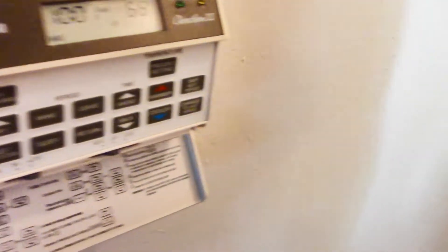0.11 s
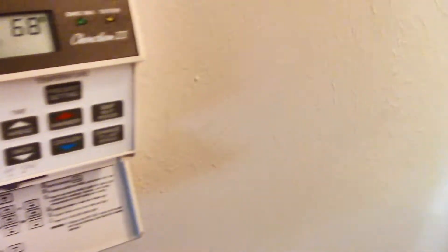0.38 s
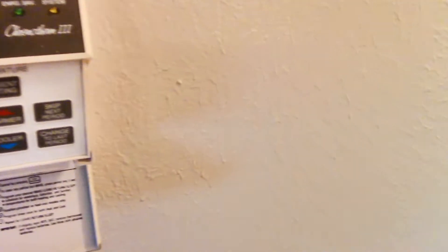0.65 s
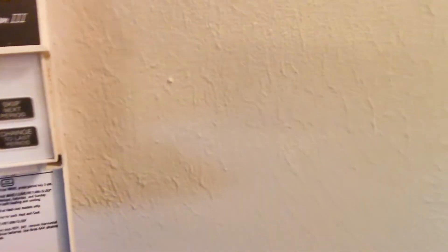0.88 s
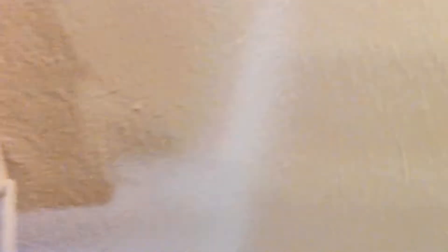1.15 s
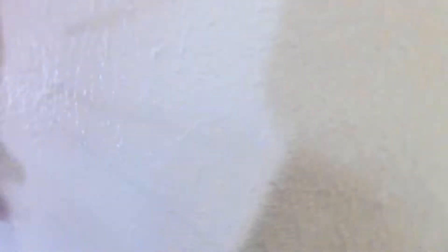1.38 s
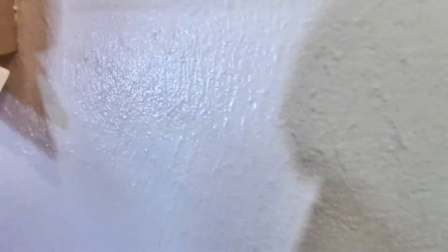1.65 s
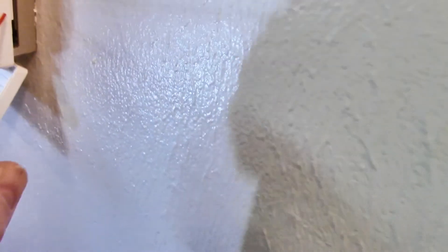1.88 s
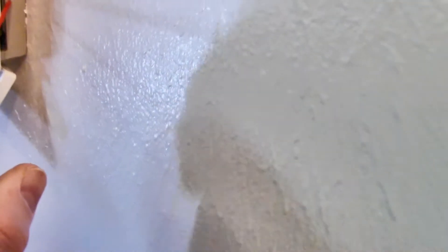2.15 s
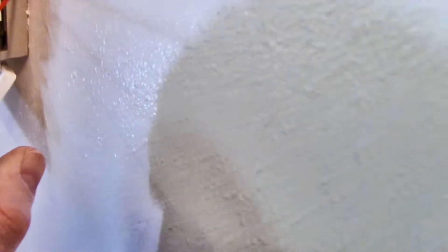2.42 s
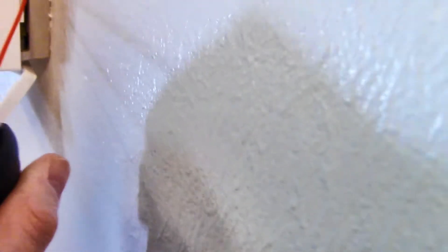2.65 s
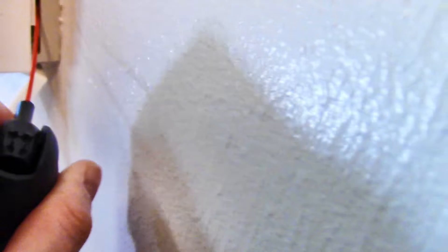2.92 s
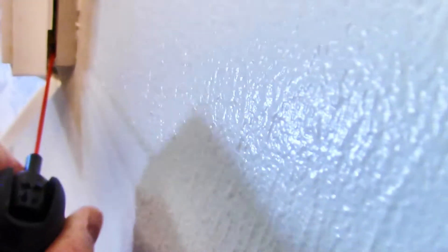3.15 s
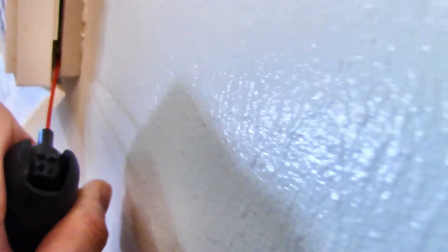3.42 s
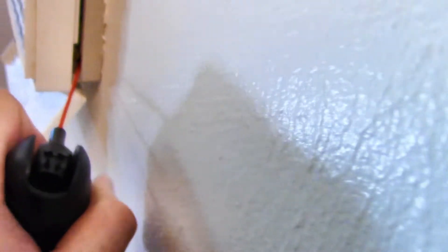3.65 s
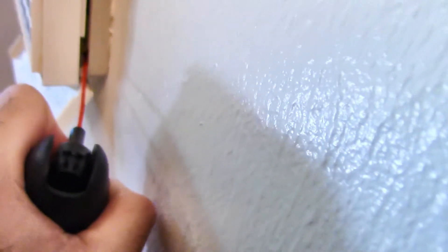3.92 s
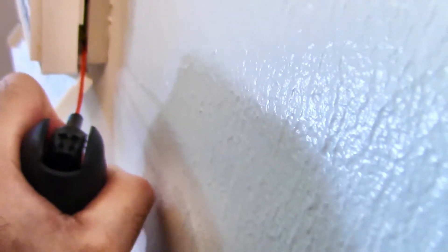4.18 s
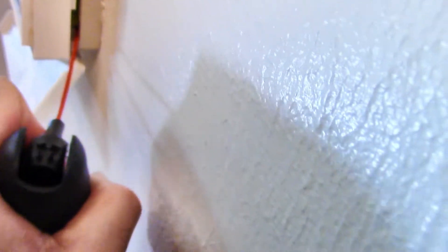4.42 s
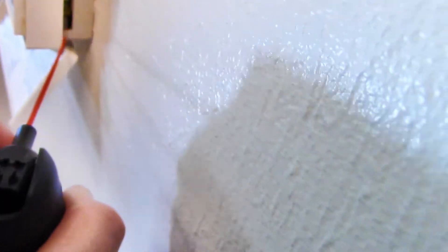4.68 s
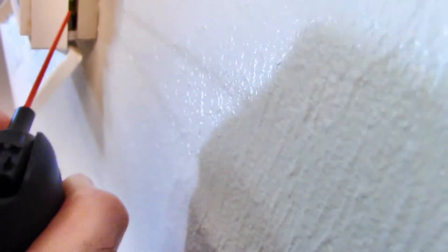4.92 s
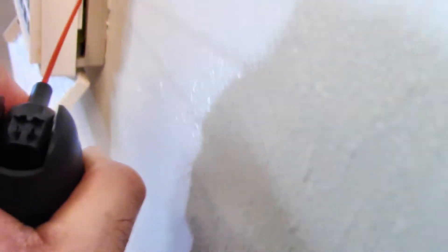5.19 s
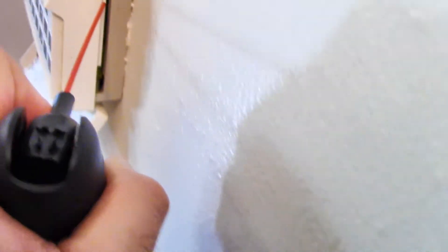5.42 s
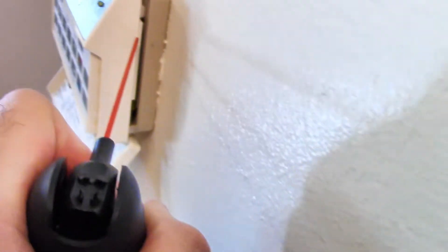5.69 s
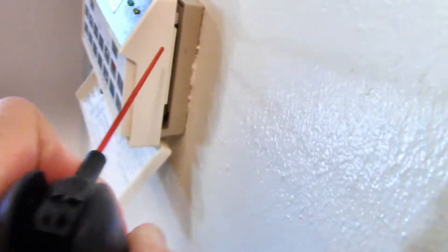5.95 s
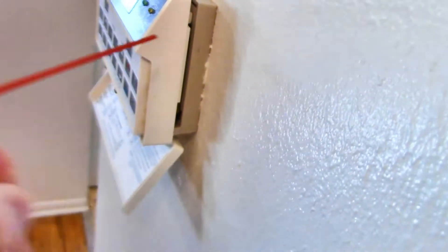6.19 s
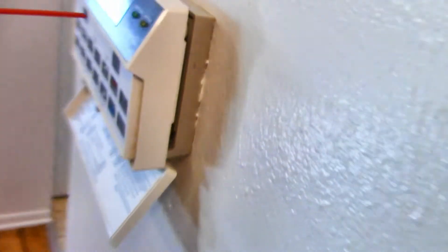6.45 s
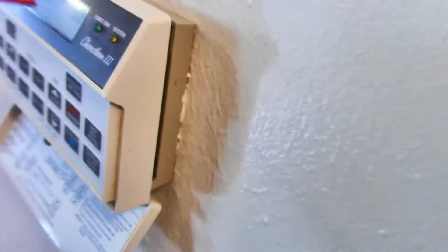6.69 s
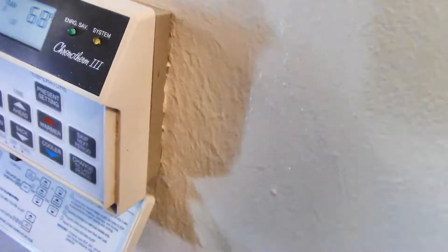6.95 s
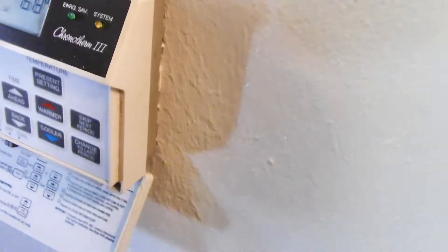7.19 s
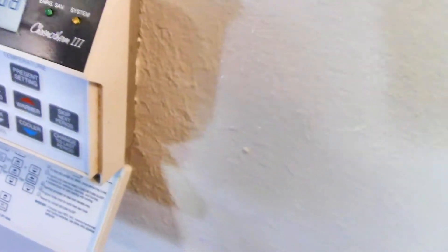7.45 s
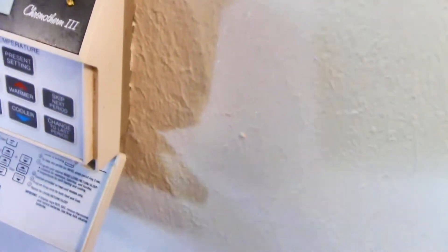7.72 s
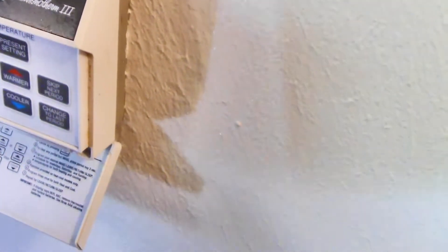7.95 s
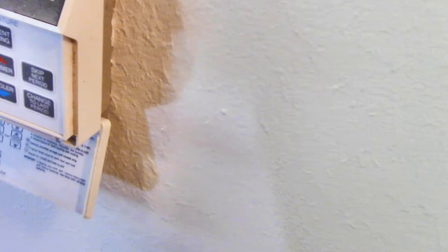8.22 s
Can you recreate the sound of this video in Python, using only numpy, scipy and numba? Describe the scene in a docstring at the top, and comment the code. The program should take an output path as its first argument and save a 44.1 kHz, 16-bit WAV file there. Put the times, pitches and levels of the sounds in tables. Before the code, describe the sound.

A can of compressed air hisses briefly, is fumbled with clicks and rustles, then sprays three long, shifting blasts close to the microphone.

```python
"""A can of compressed air is already blowing through a thin straw into the gap behind a plastic wall unit.
That first of four blasts is filtered noise: it hisses, booms in the hollow case, roars across the gap and fizzes at
the tip as the aim moves. Then the hand shifts on the can, with noise strokes of rub and rustle and thin hums, bumps
the microphone, and the straw ticks on plastic as noise bursts ringing modes. Three more blasts follow, close together.
A small room of feedback delays and faint air noise lie under it all, on a mono microphone."""
import sys
import numpy as np
from scipy import signal
from scipy.fft import rfft, irfft, next_fast_len
from scipy.io import wavfile
from scipy.ndimage import uniform_filter1d, map_coordinates
from numba import njit

SR = 44100
rng = np.random.default_rng(int(sys.argv[2]) if len(sys.argv) > 2 else 0)


def invert_db(level):
    """Linear amplitude ratio for a level in decibels (20 dB per decade), elementwise."""
    return 10 ** (np.asarray(level, dtype=float) / 20)


def wav_out(sig):
    """Save sig, one row per channel (or a flat mono array), as 16-bit PCM at SR to the path in sys.argv[1]."""
    wavfile.write(sys.argv[1], SR, np.round(np.clip(np.atleast_2d(sig).T, -1, 1) * 32767).astype(np.int16))


N = 367794
T = np.arange(N) / SR


def level(x, db):
    """Set the rms level in dB."""
    return x * invert_db(db) / np.sqrt(np.mean(x ** 2))


def hiss(spectrum):
    """Noise of rms 1 whose density follows (frequency, level) points, joined on a log frequency scale."""
    hz, db = np.transpose(spectrum)
    size = next_fast_len(N)
    bins_hz = np.arange(1, size // 2 + 2) * SR / size
    colour = invert_db(np.interp(np.log(bins_hz), np.log(hz), db))
    noise = irfft(rfft(rng.standard_normal(size)) * colour, size)
    return level(noise[:N], 0)


@njit
def band_pass(x, hz, width):
    """State-variable band-pass whose centre may move, gain 1 at the centre."""
    y, band, low = np.empty(len(x)), 0., 0.
    for i in range(len(x)):
        g, k = np.tan(np.pi * hz[i] / SR), width / hz[i]
        v = (band + g * (x[i] - low)) / (1 + g * (g + k))
        band, low, y[i] = 2 * v - band, low + 2 * g * v, k * v
    return y


def resonate(x, peaks):
    """Sum of fixed resonances with alternating signs, rms 1."""
    total = np.zeros(N)
    for k, (hz, width, db) in enumerate(peaks):
        total += (-1) ** k * invert_db(db) * band_pass(x, np.full(N, 1. * hz), 1. * width)
    return level(total, 0)


def walk(rate):
    """Random values held 1 / rate s and slewed twice; spread near 1."""
    hold = int(SR / rate)
    steps = np.repeat(rng.standard_normal(N // hold + 1), hold)
    return 1.3 * uniform_filter1d(uniform_filter1d(steps, hold), hold)[:N]


def add(x, s, sound):
    """Mix a short sound in at time s."""
    i = int(s * SR)
    x[i:i + len(sound)] += sound[:N - i]


def ring(modes, chatter, crack=0):
    """A rough contact drives every decaying mode of a body and can also be heard bare; peak 1."""
    t = np.arange(3000) / SR
    body = sum(invert_db(db) * np.sin(2 * np.pi * hz * t) * 1000 ** (-t / t60) for hz, db, t60 in modes)
    y = np.convolve(chatter, body)
    y[:len(chatter)] += crack * np.convolve(chatter, [1, 0, 0, -1])[:len(chatter)]
    return y / np.abs(y).max()


# the straw holds one aim, then jumps to the next; the bare jet has 5.5 dB on the scale of the shares:
# (time [s], jet level [dB], hollow boom share [dB], gap roar share [dB], tip fizz share [dB])
STRAW_AIMS = [(0, -8, -6, 10, 8), (0.033, -14.5, 11, 12.5, 1), (0.069, -8.5, -7.5, 9.5, 7),
              (0.178, -15, 3.5, 13.5, 7), (.225, -13, 3, 9.5, 14.5), (.33, -16, 2, 10, 8.5),
              (.45, -10.5, -4, 9.5, 6.5), (.515, -14.5, -4, 4.5, 0.5), (.55, -13.5, -2.5, 8.5, 8),
              (.59, -15.5, -8.5, 9.5, 3), (3.5, -24.5, 7, -5.5, -3.5), (3.612, -8, 7.5, 9.5, -6.5),
              (3.914, -10, 0, 16.5, 11), (4.3, -8.5, 0, 19.5, 13.5), (4.47, -8, 3.5, 22.5, 11.5),
              (4.639, -9, 6.5, 16, 15), (4.71, -9, -2, 15, 17.5), (4.9, -22, 1, 13, 10.5),
              (5.039, -18, 3, 7.5, 7), (5.112, -9, -1.5, 12, 19), (5.27, -9.5, -0.5, 9.5, 17),
              (5.49, -8.5, 1, 8.5, 13.5), (5.721, -9.5, -0.5, 11.5, 16), (5.854, -14, -1.5, 13, 10),
              (6.019, -23.5, -7, -12.5, -11), (6.1, -28.5, -4.5, 2, -5), (6.22, -15.5, -8, 9, 5.5),
              (6.31, -18, -3, 8.5, 8), (6.47, -19.5, -1.5, 13, 13.5), (6.661, -17.5, 4, 19, 18),
              (6.8, -13, 1, 16, 7.5), (6.93, -14, -4, 9, -4), (7.06, -16, 3, 9.5, 0),
              (7.2, -15.5, 3, 14, 6), (7.278, -17.5, 4.5, 15.5, 18), (7.6, -18.5, 7, 16, 19.5),
              (7.86, -17.5, 7, 16, 19), (7.95, -15.5, 0, 18, 15.5), (8.036, -16, -8, 2, -14),
              (8.105, -22, 0.5, 4.5, 3), (8.25, -19, -2, 9, -0.5)]


def aim():
    """Jet level and shares of boom, roar and fizz, each jump of aim spread over 14 ms."""
    start, *columns = np.transpose(STRAW_AIMS)
    held = np.searchsorted(start, T, "right") - 1
    return [uniform_filter1d(column[held], size=int(0.014 * SR)) for column in columns]


# as the straw travels; sizzle on the same scale as the other shares:
# (time [s], gap resonance [Hz], tip resonance [Hz], open-air sizzle share [dB])
STRAW_TRAVEL = [(0, 3400, 9500, 8.5), (.17, 3930, 8700, 3.5), (.22, 4380, 10800, -6.5),
                (.45, 4230, 9400, -16.5), (.6, 4120, 8800, 7.5), (3.62, 3320, 7950, -19),
                (3.9, 3590, 7600, -17.5), (4.3, 3680, 7200, 10), (4.63, 4370, 7900, 10.5),
                (4.66, 3320, 8900, -6), (4.8, 4340, 7500, -19.5), (5.11, 3370, 9700, -25),
                (5.5, 3450, 8000, -23), (5.8, 4140, 8600, -9), (5.9, 3920, 8100, 15),
                (6.0, 3630, 7200, -23.5), (6.27, 3550, 9600, -13), (6.45, 3610, 8500, -1),
                (6.55, 4960, 8200, 12), (6.78, 4090, 9500, 17), (6.85, 4120, 7900, 4),
                (7.2, 3980, 8500, -3.5), (7.3, 4090, 10600, 18.5), (7.701, 3850, 9000, 18.5),
                (8.0, 3520, 9000, 7), (8.1, 3140, 8500, -19), (8.29, 3500, 8800, -8.5)]


def travel():
    """Resonances and open-air sizzle glide as the straw travels."""
    s, *columns = np.transpose(STRAW_TRAVEL)
    return [np.interp(T, s, column) for column in columns]


# short swells of the jet: (middle [s], half width [s], level [dB])
JET_SURGES = [(4.978, 0.01, 10.5), (5.66, .05, 1), (5.971, 0.024, 5.5), (6.275, 0.011, 6), (6.83, 0.11, 0),
              (7.25, 0.071, 3), (8.02, 0.046, 6.5), (8.285, .012, 5)]


def surges():
    """Bell-shaped swells, in dB."""
    return sum(db * np.exp(-((T - mid) / half) ** 2) for mid, half, db in JET_SURGES)


# the valve opens and shuts; the first blast is already under way: (opens [s], is shut [s])
VALVE_BLASTS = [(-.1, .642), (3.571, 4.804), (4.946, 6.04), (6.199, 8.304)]


def valve():
    """Flow through the valve, ramped in dB at both ends of a blast and nil between blasts."""
    open_s, shut_s, quiet_db = 0.013, 0.015, -24  # ramps, and the level at their quiet ends
    total = np.zeros(N)
    for start, end in VALVE_BLASTS:
        opening = np.clip(np.minimum((T - start) / open_s, (end - T) / shut_s), 0, 1)
        total += (T > start) * (T < end) * invert_db(quiet_db * (1 - opening))
    return total


# the straw tip is pressed shut for a moment, edges still sharp: (time [s], length [s], depth [dB])
TIP_BLOCKS = [(4.634, 0.0137, -5), (5.475, .022, -12.5), (5.521, 0.0039, -23), (5.609, 0.013, -11.5),
              (5.636, 0.0091, -17.5)]


def jet_flow(jet_db):
    """Valve, jet level and a pressed tip set how strongly the air flows."""
    flow = valve() * invert_db(jet_db)
    for start, length, db in TIP_BLOCKS:
        flow = flow * invert_db(db * ((T > start) & (T < start + length)))
    flow = flow * invert_db(0.66 * walk(60))
    return uniform_filter1d(flow, size=100)  # the valve takes a few ms to move


# colour of the bare jet: (frequency [Hz], relative density [dB])
JET_COLOUR = [(40, -71), (150, -31), (500, -18), (1300, -0.5), (2200, 1.5), (5500, -16.5), (15600, -22)]
# resonances of the hollow case: (frequency [Hz], width [Hz], relative level [dB])
HOLLOW_CASE = [(658, 295, -1.5), (830, 260, 0.5), (1220, 167, -2)]


def jet():
    """Turbulent air, and the spaces it excites as the straw is aimed; also returns its flow."""
    jet_db, boom_db, roar_db, fizz_db = aim()
    gap_hz, tip_hz, sizzle_db = travel()
    surge_db = surges()
    fizz_db = fizz_db + surge_db  # each swell fizzes more
    flow = jet_flow(jet_db + surge_db)

    boom_air, gap_air, tip_air, open_air = rng.standard_normal((4, N))
    gap_hz = gap_hz * (1 + 0.015 * walk(12))
    broad = band_pass(band_pass(gap_air, gap_hz, 3660.0), gap_hz, 3400.0)
    core = band_pass(gap_air, gap_hz, 570.0)
    # the squarer the jet strikes, the narrower its roar
    roar = level(broad + invert_db(roar_db - 25) * core, 0)
    fizz = level(band_pass(band_pass(tip_air, tip_hz, 6500.0), tip_hz, 8000.0), 0)
    boom = resonate(boom_air, HOLLOW_CASE)
    sizzle = resonate(open_air, [(11700, 5800, 0)])

    layers = [hiss(JET_COLOUR), boom, roar, fizz, sizzle]
    shares = invert_db([np.full(N, 5.5), boom_db, roar_db, fizz_db, sizzle_db])
    mix = sum(x * share * invert_db(1.3 * walk(45)) for x, share in zip(layers, shares))
    # the shares set the colour, the flow alone the level
    return flow * mix / np.sqrt(np.sum(shares ** 2, axis=0)), flow


# echoes off wall and case: (mean delay [ms], gain before its wobble [factor], drift of delay [share])
NEAR_ECHOES = [(.31, .2, .06), (.66, .2, .15), (1.0, .12, .15)]


def wall_echoes(direct):
    """Wall and case a hand's width away send the treble back; the paths drift as the can moves."""
    treble = signal.sosfilt(signal.butter(1, 4000, "high", fs=SR, output="sos"), direct)
    out = np.zeros(N)
    for ms, gain, drift in NEAR_ECHOES:
        wobble = invert_db(3 * walk(5))
        delay = SR / 1000 * ms * (1 + drift * walk(2.5))  # samples
        out += gain * wobble * map_coordinates(treble, [np.arange(N) - delay], order=3)
    return out


# spent air at the microphone during the second and third blasts, before its wobble: (time [s], level [dB])
SPENT_AIR = [(3.6, -30), (4.1, -49.5), (4.6, -45), (4.66, -38.5), (5.3, -58), (5.52, -28), (6.0, -52.5)]


def buffeting(flow):
    """Low noise of spent air buffets the microphone during the second and third blasts."""
    open_valve = uniform_filter1d(1. * (flow > 1e-3), size=400)
    gust_db = np.interp(T, *np.transpose(SPENT_AIR), left=-99, right=-99) + walk(25)
    return open_valve * resonate(rng.standard_normal(N), [(221, 270, 0)]) * invert_db(gust_db)


# the straw and trigger tick and scratch on plastic:
# (time [s], peak level [dB], added to the lower modes [dB], chatter [ms])
PLASTIC_TICKS = [(1.309, -36, 8, 4.8), (1.987, -23.5, -14, 2.9), (2.045, -25, -15, 3.6),
                 (2.443, -5.5, 0.5, 4), (2.451, 0, 18, 3.7), (2.484, -30, 15, 3), (2.606, -16.5, 20.5, 5.1),
                 (2.887, -13, 1, 5.9), (2.93, -24, -18, 6.4), (2.953, -24, -18, 8.4), (2.981, -28, -3, 7),
                 (3.029, -25, 8, 10), (3.193, -13, 13.5, 10), (3.467, -26, 29, 5.9)]
# modes of the plastic, before that shift: (frequency [Hz], relative level [dB], 60 dB decay [s])
PLASTIC_MODES = [(1700, -3, .005), (2400, -5, .004), (3160, -4, .009), (3800, -6, .004), (4500, -2, .009),
                 (6000, -3, .004), (8000, -1, .004), (10100, 1, .004), (12200, -5, .003)]


def ticks():
    """Each contact chatters for a few ms; how squarely it lands sets the share of the lower modes."""
    out = np.zeros(N)
    for s, db, low_db, ms in PLASTIC_TICKS:
        modes = [(hz, mode_db + low_db * (hz < 7000), t60) for hz, mode_db, t60 in PLASTIC_MODES]
        fade = np.exp(-(np.arange(900) * 1000 / SR / ms) ** 2)
        add(out, s, invert_db(db) * ring(modes, rng.standard_normal(900) * fade, crack=5.0))
    return out


# dull bumps on the hand-held microphone, before its mount:
# (time [s], peak level [dB], added to the upper modes [dB])
MIC_BUMPS = [(0.067, -14, -12), (0.77, -31.5, -1), (0.955, -28, 3), (0.87, -27, -8), (1.223, -12, -1),
             (1.447, -23.5, -15), (1.777, -33, -9), (2.111, -17, -10), (2.361, -26, 3), (2.755, -23, 2),
             (3.101, -19, 8), (3.181, -13, 23), (4.63, -9.5, 3), (5.493, -7, 18), (8.137, -22, 7),
             (8.149, -16, -4), (8.171, -17.5, -12)]
# modes of the microphone body, before that shift: (frequency [Hz], relative level [dB], 60 dB decay [s])
MIC_BODY = [(205, -1, 0.022), (321, -1, 0.016), (594, -0.5, 0.041), (800, -2, 0.011), (1050, -9, 0.014)]


def bumps():
    """A soft, shuffling push of some ms on the microphone body, whose mount takes up the slowest part."""
    out = np.zeros(N)
    fade = np.exp(-np.arange(1200) / (0.0069 * SR))
    for s, db, high_db in MIC_BUMPS:
        modes = [(hz, mode_db + high_db * (hz > 400), t60) for hz, mode_db, t60 in MIC_BODY]
        add(out, s, invert_db(db) * ring(modes, rng.standard_normal(1200) * fade))
    return signal.sosfilt(signal.butter(3, 160, "high", fs=SR, output="sos"), out)


# thin hums that come and go while the can is rubbed:
# (start [s], end [s], frequency at the start [Hz], glide [Hz/s], level [dB])
RUBBED_HUMS = [(1.322, 1.43, 235, -1, -38.5), (1.5, 1.75, 404, 1, -40.5), (2.05, 2.305, 2000, -700, -41.5),
               (2.76, 2.94, 246, 0, -36.5), (2.885, 3.0, 3120, 0, -43.5), (2.89, 2.99, 5600, 0, -52),
               (2.99, 3.07, 1830, -1000, -42)]


def hums():
    """Narrow, gliding bands of noise, faded in and out."""
    white = rng.standard_normal(N)
    out = np.zeros(N)
    for start, end, hz, glide, db in RUBBED_HUMS:
        centre_hz = np.clip(hz + glide * (T - start), hz / 2, 2 * hz)
        tone = level(band_pass(white, centre_hz, 22 + hz / 30), db)
        out += tone * uniform_filter1d(1. * (T > start) * (T < end), size=900)
    return out


# skin and straw sliding on can and wall, one row a stroke:
# (start [s], hold [s], stroke level [dB], rustle re stroke [dB])
HAND_STROKES = [(0.759, 0.018, -38.5, -5.5), (0.848, .02, -38, -11), (0.942, .02, -40, -16),
                (1.113, 0.083, -39.5, -14), (1.239, .04, -34, -16), (1.297, 0.076, -31, -10.5),
                (1.462, 0.24, -37.5, -13), (1.779, 0.06, -38.5, -12.5), (1.919, 0.093, -20, -10.5),
                (2.142, 0.072, -28.5, -2), (2.245, 0.089, -30.5, -14.5), (2.363, 0.07, -28, -15),
                (2.448, 0.028, -21.5, -14), (2.515, 0.056, -24, -15), (2.615, 0.11, -26, -12),
                (2.752, 0.015, -21, -15.5), (2.867, 0.011, -28.5, -8), (2.975, .1, -37.5, -6.5),
                (3.09, 0.055, -26, -11), (3.184, 0.063, -29, -7), (3.275, 0.1, -26, -12),
                (3.448, 0.25, -34, -17)]
# colour of the dull rub: (frequency [Hz], relative density [dB])
RUB_COLOUR = [(40, -37), (100, -18), (240, 0), (650, -2.5), (2000, -13.5), (5000, -46)]
# colour of the rustle: (frequency [Hz], relative density [dB])
RUSTLE_COLOUR = [(500, -47), (1000, -3.5), (2850, 0.5), (6800, -10), (10500, -24.5), (12100, -20.5),
                 (15600, -47)]


def grip():
    """Uneven sliding: a dull rub and a grainy rustle above it."""
    rise_db_s, fall_db_s = 900, 185  # dB per s
    start, hold, stroke_db, rustle_db = np.transpose(HAND_STROKES)[:, :, None]
    ramp_db = np.minimum(rise_db_s * (T - start), fall_db_s * (start + hold - T))
    stroke_db = stroke_db + np.minimum(0, ramp_db)
    # overlapping strokes add in power
    touch = np.sqrt(np.sum(invert_db(2 * stroke_db), axis=0))
    scrape = np.sqrt(np.sum(invert_db(2 * (stroke_db + rustle_db)), axis=0))
    rub = level(hiss(RUB_COLOUR) * invert_db(1.6 * walk(44.53)), -2.0)
    # a fresh grain every 40 samples, now and then a strong one
    grains = invert_db(np.minimum(2.0 * rng.exponential(size=N // 40 + 1), 14)).repeat(40)[:N]
    rustle = level(hiss(RUSTLE_COLOUR) * (1 + 1.2 * grains), 0) * invert_db(2.7 * walk(60))
    return touch * rub + scrape * rustle


@njit
def delay_network(x, lags, gain, damp):
    """Eight delay lines that feed each other, duller on every round."""
    line, soft, out = np.zeros((8, 4096)), np.zeros(8), np.zeros(len(x))
    for i in range(len(x)):
        total = 0.
        for k in range(8):
            soft[k] += (1 - damp) * (gain[k] * line[k, (i - lags[k]) & 4095] - soft[k])
            total += soft[k]
        out[i] = soft[0] - soft[3] + soft[5] - soft[6]
        for k in range(8):
            line[k, i & 4095] = x[i] + soft[k] - total / 4
    return out


def small_room(near):
    """The walls answer faintly; each line's loss sets the decay of the bass, damping shortens the treble."""
    t60_s, damp, room_db = 0.36, 0.37, -15
    lags = rng.integers(500, 2300, 8)  # samples
    # the tiny offset keeps silence from slowing the arithmetic
    return invert_db(room_db) * delay_network(near + 1e-18, lags, invert_db(-60 * lags / SR / t60_s), damp)


# colour of the room's air: (frequency [Hz], relative density [dB])
AIR_COLOUR = [(40, -54), (160, 1.5), (400, 1.5), (2400, -12), (6800, -17.5), (15000, -38)]


def quiet_air():
    """Steady coloured noise near -47 dB whose level wavers."""
    return hiss(AIR_COLOUR) * invert_db(-47 + 3.3 * walk(21))


def scene():
    """Everything is close; the room answers jet and ticks over its own quiet air, alike in both channels."""
    direct, flow = jet()
    near = direct + wall_echoes(direct) + buffeting(flow) + ticks()
    handling = bumps() + hums() + grip()
    return np.tile(near + handling + small_room(near) + quiet_air(), (2, 1))


def roll_off(x):
    """The treble ends steeply here."""
    return signal.sosfilt(signal.butter(12, 15750, fs=SR, output="sos"), x)


def record(dry):
    """The microphone cuts the bass and hears its own casing; a steep low-pass ends the treble, peaks round off."""
    dry = signal.sosfilt(signal.butter(2, 90, "high", fs=SR, output="sos"), dry)
    # steep low-pass at 15.7 kHz
    dry = signal.sosfilt(signal.ellip(8, 0.2, 60, 15700, fs=SR, output="sos"), dry)
    # a bounce of 3 cm inside the casing hollows out the band near 5.5 kHz
    dry = dry + 0.11 * np.roll(dry, 4, axis=1)
    mix = 1.188 * np.tanh(dry / 1.216)
    return roll_off(mix)


dry = scene()
out = record(dry)
wav_out(out)
```